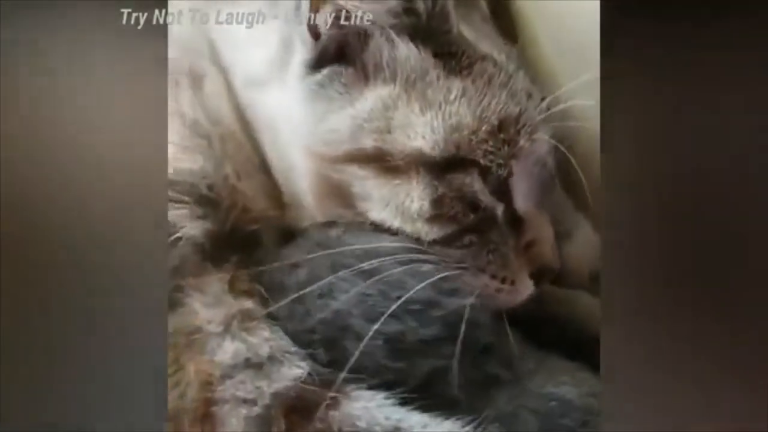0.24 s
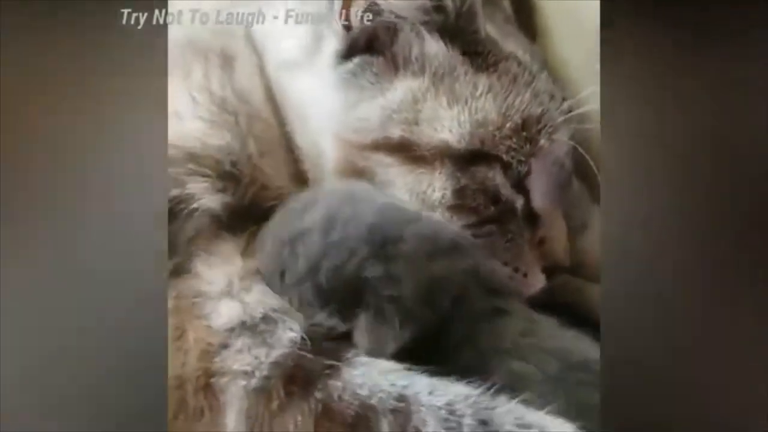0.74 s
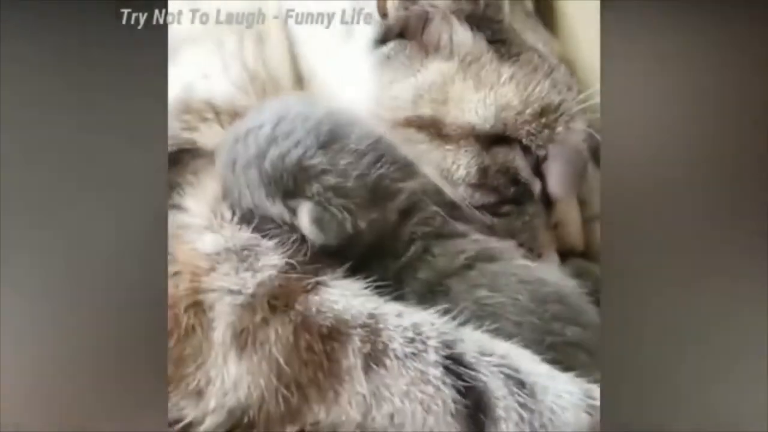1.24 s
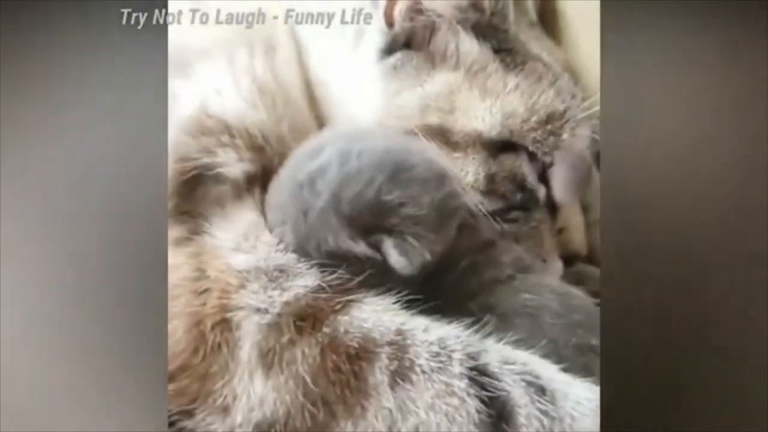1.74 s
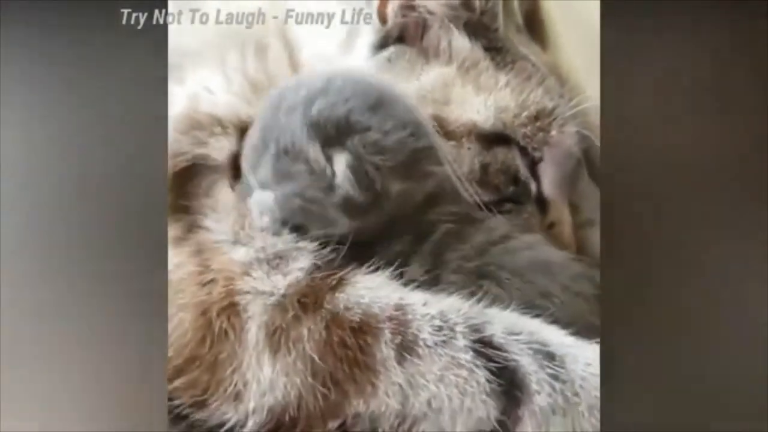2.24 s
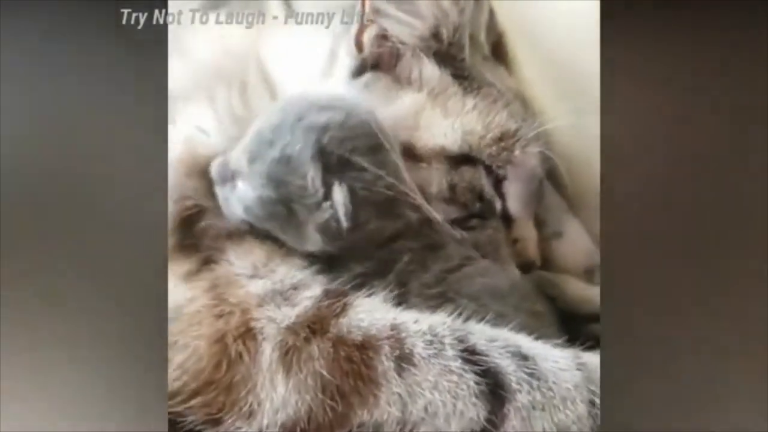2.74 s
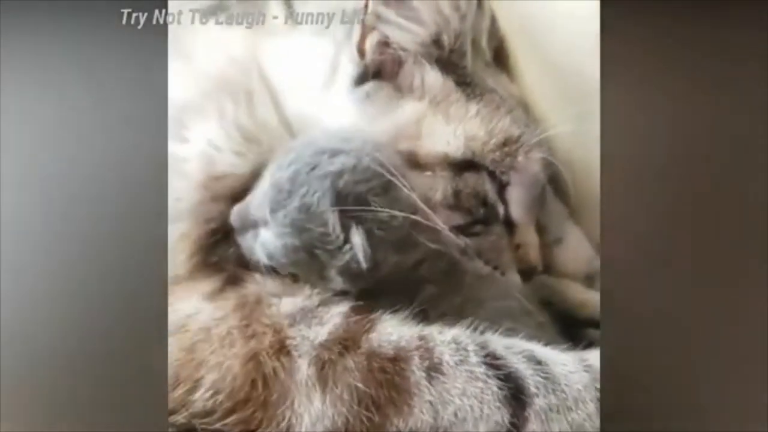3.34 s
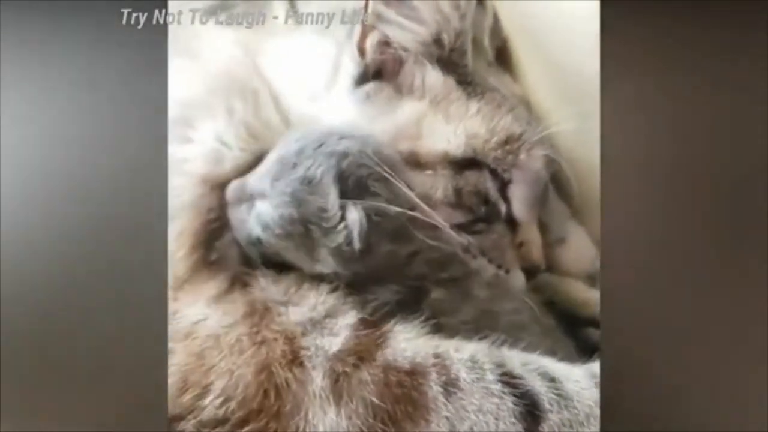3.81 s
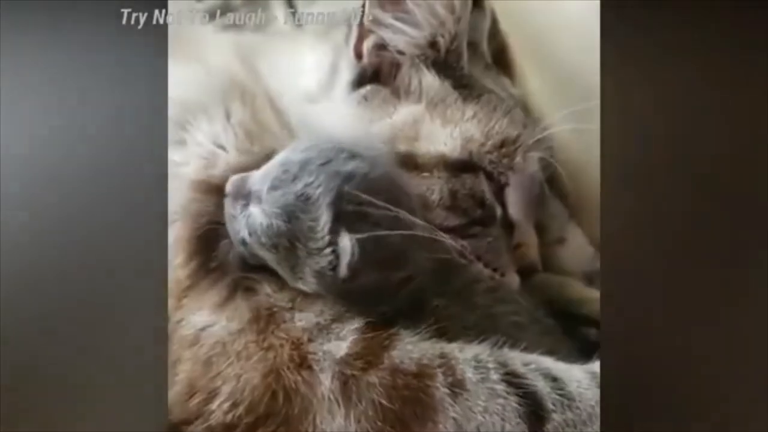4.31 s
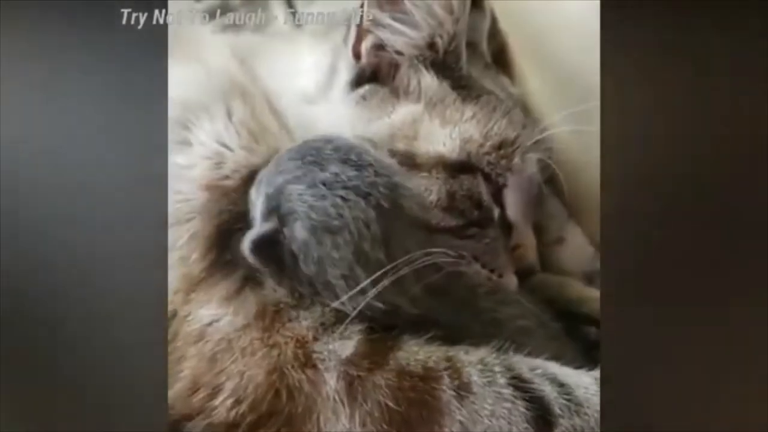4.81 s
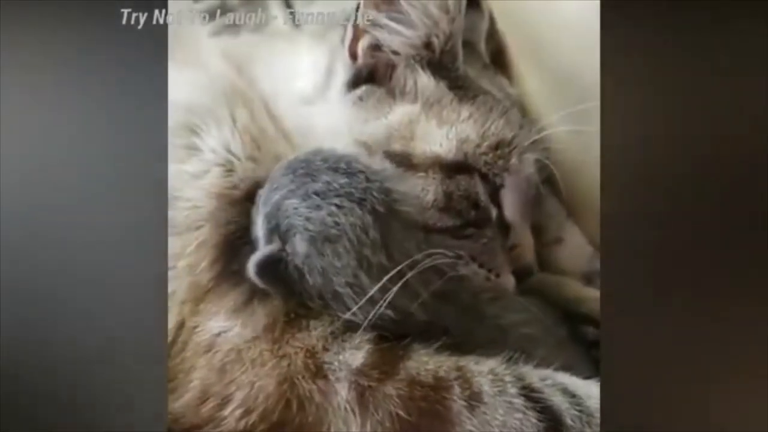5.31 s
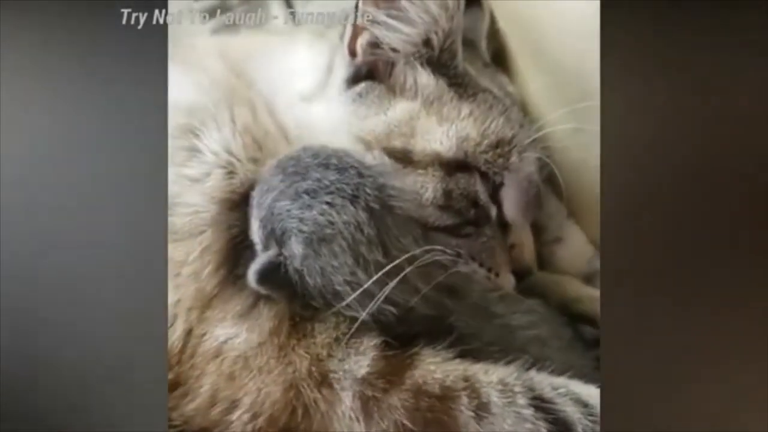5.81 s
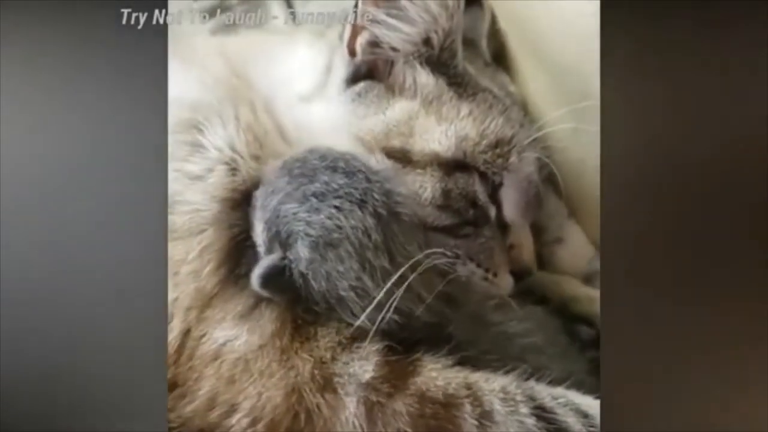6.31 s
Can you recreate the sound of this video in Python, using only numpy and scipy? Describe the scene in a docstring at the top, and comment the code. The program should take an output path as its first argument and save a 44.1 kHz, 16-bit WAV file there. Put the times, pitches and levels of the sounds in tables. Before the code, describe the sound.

Throughout, a cat purrs very close to the microphone in a small quiet room: a low, bassy flutter of paired throat beats, about twenty-six cycles a second, with slight crackly edges and faint nasal hiss. It turns with each breath, stronger on the out-breaths near 0.7-1.3, 2.4-2.8, 3.5-4, 4.7-5.1 and 5.9-6.4 seconds. A faint, thin, slightly rough squeak sounds at 0.1-0.3. Tiny crisp clicks follow at 0.4 and 0.7, brightest at about 0.85, then fur rustles softly until 1.3. Muffled engines drone outside, swelling from 1.4 to 2.8 and sinking in pitch until 3.9, with a brief higher whirr around 3-3.4. More small clicks scatter from 3 to 4.3, one duller knock at 3.7 towards the left. A short low drone passes at about 4, then another steadier engine from 4.7 to the end. Soft traffic rumble, mains hum and hiss remain underneath.

```python
"""A cat purrs beside a phone on a bed: two throat beats a cycle, turning with each breath, and faint air in its nose.
Engines drone outside, small clicks and a thin squeak sound, and fur rustles over mains hum, traffic rumble and hiss.
The throat is struck by impulses and the nose filters noise; engines are sums of overtones with moving levels.
Clicks are noise bursts with room tails, the squeak is a rough tone, and rumble, rush and hiss are coloured noise."""
import sys
import numpy as np
from scipy import signal
from scipy.fft import rfft, irfft, next_fast_len
from scipy.io import wavfile
from scipy.ndimage import uniform_filter1d, map_coordinates

SR = 44100
rng = np.random.default_rng(int(sys.argv[2]) if len(sys.argv) > 2 else 0)


def transcribe(signal):
    """Save signal, clipped to [-1, 1], as a 16-bit WAV file at the path in sys.argv[1]."""
    frames = np.atleast_2d(signal).T
    limited = np.clip(frames, -1, 1)
    pcm = np.round(limited * 32767).astype(np.int16)
    wavfile.write(sys.argv[1], SR, pcm)


N = 288855
TIME = np.arange(N) / SR  # s

BEAT_HZ = 26.25  # cycles of the purr a second, before its pace bends
# pace of the purr, mostly slower breathing out and faster breathing in: time_s, lag_ms (behind a steady beat)
PURR_PACE = [(0, 50.2), (.5, 17.3), (.75, 6.94), (.9, 12.4), (1.15, 16.9), (1.4, 14.1), (1.5, 13.7),
             (1.68, 25.3), (2.125, 32.3), (2.4, 32.2), (2.88, 45.2), (3.25, 34.7), (3.55, 38.7),
             (3.78, 51.5), (4.125, 58), (4.5, 43.8), (4.9, 46), (5.25, 44.7), (5.6, 36), (5.875, 26.8),
             (6.55, 31.6)]


def purr():
    """Source and filter: the larynx shuts and opens each cycle, and these impulses excite the throat's response."""
    # spectra of the throat and of the sharp edge of the beats: frequency_hz, relative_level_db
    throat_spectrum = [(40, -34.5), (70, -7), (150, -4), (230, 2), (330, -3), (430, -9.5), (490, -15.5),
                       (560, -29), (750, -35), (1500, -52.5), (4000, -57), (20000, -100)]
    snap_spectrum = [(300, -24.5), (550, -4.5), (750, -0.5), (1100, -9.5), (2000, -22.5), (3000, -28),
                     (6000, -41), (20000, -80.5)]
    # the sharpest snaps in the throat: time_s, gain_db
    sharp_snaps = [(0.339, -66), (0.378, -62), (0.414, -56.5), (0.449, -57), (0.522, -61), (0.594, -63),
                   (0.667, -64), (0.861, -61), (1.357, -58.5), (1.715, -60.5), (2.511, -64), (2.525, -63),
                   (2.588, -65), (2.628, -62), (2.601, -59), (2.641, -59.5), (2.719, -64), (2.838, -68),
                   (2.975, -60), (2.988, -63), (3.024, -66), (3.133, -63), (3.285, -61), (3.755, -56),
                   (3.795, -55.5), (4.212, -60), (4.475, -65), (4.781, -64), (4.863, -58.5), (4.885, -60),
                   (5.125, -67), (5.236, -66), (5.273, -62), (5.31, -61.5), (6.047, -62)]
    steady = np.arange(-1, N / SR * BEAT_HZ) / BEAT_HZ
    first = steady + curves(PURR_PACE, steady + .03)[0] / 1000 - .002
    # the sign of each gain is the air's direction
    opening = breathing(first, 2, turn_db=-10)
    closing = breathing(first, 3, turn_db=-6)
    chance = rng.standard_normal((len(first), 6))
    # the two beats lie further apart breathing out
    second = first + np.where(opening < 0, .015, .012) + .0006 * chance[:, 0]
    first = first + .0005 * chance[:, 1]
    beats = train(first, opening * amp(1.6 * chance[:, 2]))
    closings = train(second, closing * amp(1.7 * chance[:, 3]))

    snaps = train(second, closing * amp(-22 + 2 * chance[:, 4]))
    snaps += train(first, opening * amp(-29 + 2.5 * chance[:, 2]))
    sharp_s, sharp_db = np.transpose(sharp_snaps)
    snaps += train(sharp_s, np.sign(breathing(sharp_s, 3, 0)) * amp(sharp_db))
    # the folds rebound once, weakly, after the second beat
    closings += train(second + 0.01102, closing * amp(-12 + 3 * chance[:, 5]))

    # a puff of turbulent air follows each beat through the same throat
    puff_decay = amp(-60 * TIME[:2000] / 0.055)
    puff = np.convolve(abs(beats + closings), puff_decay)[:N] * rng.standard_normal(N)
    excitation = beats + closings + amp(-41) * puff
    voice = signal.fftconvolve(excitation, pulse(throat_spectrum))[:N]
    edge = signal.fftconvolve(snaps, pulse(snap_spectrum))[:N]
    both = amp(4.0) * (voice + edge * amp([[1.8], [-1.8]]))
    # the throat is nearer the left microphone, which hears it earlier
    return filtered(both, lambda f: np.exp(2j * np.pi * f * np.array([[.00013], [-.00013]])))


def nose():
    """Resonance of turbulent air: hiss excites the modes of the nose, and each direction of breath favours other modes."""
    # modes, each passed twice by the air: centre_hz, width_hz (of one pass)
    modes = [(1380, 500), (2450, 380), (2850, 320), (7300, 1300)]
    # level of each mode: rest_gain_db, in_gain_db and out_gain_db (both over the air)
    mode_gains = [(-99, 3.5, 0), (-102, 1.5, -7.5), (-101, 1, 2), (-89.5, 3.5, -2)]
    air = breathing(TIME, 4, turn_db=-25)
    # the larynx chops the air once a cycle
    cycle = 2 * np.pi * BEAT_HZ * (TIME - curves(PURR_PACE)[0] / 1000 - .02)
    air = air * amp(2.5 * np.cos(cycle))
    inward, outward = np.maximum(air, 0), np.maximum(-air, 0)
    total = 0
    for (rest_db, in_db, out_db), mode in zip(mode_gains, modes):
        gain = amp(rest_db) + amp(in_db) * inward + amp(out_db) * outward
        flutter = amp(2.4 * wobble(90))
        hiss = rush(lambda f: resonance(*mode)(f) ** 2, patchy_db=2.0)
        total = total + gain * flutter * hiss * amp([[1.6], [-1.6]])
    return total


def breathing(t, column, turn_db):
    """Alternating flow: a column's gain peaks amid each breath, changes by turn_db at the turns, and has the air's sign."""
    # breaths, each lasting until the next:
    # start_s, direction (sign only: + in, - out), first_beat_gain_db, second_beat_gain_db, nose_air_gain_db
    breaths = np.array([(-.05, 1, -46.5, -46.5, -89), (.72, -1, -39, -42.5, -82),
                        (1.346, 0.99, -42.5, -50.5, -95), (1.47, -1, -45.5, -44.5, -91.5),
                        (1.84, 1, -45.5, -44.5, -89.5), (2.4, -1.03, -41, -43, -84),
                        (2.8, 1, -55, -44.5, -98), (3.5, -0.91, -41, -44, -81.5),
                        (4.05, 1, -47, -46.5, -102), (4.68, -1, -41.5, -43.5, -83),
                        (5.12, 1, -51, -46, -96), (5.87, -1.02, -42, -44, -87),
                        (6.36, 0.99, -47, -48.5, -92.5)])
    turns = np.append(breaths[:, 0], 6.8)  # the last breath ends at 6.8 s
    now = np.clip(np.searchsorted(turns, t) - 1, 0, len(breaths) - 1)
    part = (t - turns[now]) / np.diff(turns)[now]
    return np.sign(breaths[now, 1]) * amp(breaths[now, column] + turn_db * (2 * part - 1) ** 2)


def engines():
    """Harmonic series of periodic firing: three engines in turn, and two lone tones among them."""
    # engines: time_s, firing_rate_hz, then one gain_db for each overtone
    passing = [(0.02, 36.3, -43.5, -54, -45.5, -49.5), (0.14, 38.22, -64.5, -45, -59, -63),
               (0.51, 37.84, -57, -52.5, -50, -53.5), (0.66, 38.33, -53, -42, -44.5, -67),
               (0.86, 39.07, -49.5, -72, -54.5, -53.5), (0.98, 37.28, -78, -60, -66, -51),
               (1.08, 37.97, -49, -47, -44.5, -51), (1.16, 36.7, -47, -49, -47, -65),
               (1.29, 38.93, -47, -43.5, -42, -64), (1.43, 37.17, -39, -39, -42.5, -57),
               (1.55, 38.57, -40, -45, -38.5, -62), (1.65, 37.8, -47, -32.5, -53, -65),
               (1.72, 36.9, -34, -39.5, -60.5, -41.5), (1.78, 37.63, -49, -33.5, -34.5, -49.5),
               (2.02, 36.92, -36.5, -38, -58.5, -49), (2.09, 37.38, -63.5, -34, -52, -55),
               (2.14, 36.86, -43.5, -35.5, -54, -65), (2.2, 35.95, -41, -32.5, -51.5, -41),
               (2.26, 36.06, -35.5, -58, -56, -53.5), (2.38, 35.93, -38.5, -40, -55, -45.5),
               (2.45, 35.33, -42, -55, -63.5, -59), (2.5, 35.02, -35, -38, -44, -55.5),
               (2.55, 35.12, -38, -45, -51, -61), (2.59, 35.18, -32, -37.5, -43, -70),
               (2.66, 35.12, -37.5, -37.5, -57, -48), (2.7, 34.5, -40, -36.5, -56, -50),
               (2.75, 34.32, -38, -47, -68.5, -49), (2.81, 33.96, -39.5, -44, -47, -48),
               (3.0, 32.43, -54, -45.5, -58, -48.5), (3.16, 31.01, -45, -45, -53, -49.5),
               (3.24, 30.66, -46, -43.5, -67, -50), (3.27, 30.67, -53, -68, -53, -47),
               (3.34, 29.9, -49, -36, -58, -44), (3.38, 29.74, -48, -63, -61, -41.5),
               (3.43, 30.5, -45, -58.5, -57, -43.5), (3.46, 30.28, -48, -55, -72.5, -44),
               (3.54, 29.83, -68, -52, -59.5, -40.5), (3.82, 28.2, -62, -53, -67, -42),
               (3.87, 27.73, -54, -48, -62, -64), (3.9, 27.8, -55, -49, -44, -55)]
    brief = [(3.85, 55.67, -76, -62), (3.9, 54.2, -47.5, -44.5), (4.05, 54.77, -44, -49.5),
             (4.22, 54.77, -49.5, -41.5), (4.29, 55, -47, -46), (4.36, 54.6, -49, -54)]
    later = [(4.75, 36.63, -66, -57.5, -61), (4.95, 36.66, -50, -52, -56.5),
             (5.046, 36.62, -36.5, -56, -53), (5.108, 36.87, -58, -48, -55), (5.18, 36.64, -39, -50, -69),
             (5.25, 36.96, -42, -50, -52), (5.4, 35.52, -55, -56, -58), (5.55, 36.15, -47.5, -43.5, -51),
             (5.72, 36.72, -61, -41, -61), (5.874, 37.23, -59, -44, -61), (6.1, 37.16, -47.5, -40, -52),
             (6.2, 37.05, -61, -45, -52.5), (6.35, 37.16, -61, -44, -67), (6.55, 37.33, -45, -39.5, -49)]
    # the first engine's sixth overtone, heard for a moment: time_s, pitch_hz, gain_db
    sixth = [(2.15, 216, -58), (2.3, 215.7, -52), (2.5, 210, -53), (2.7, 207.1, -54), (2.8, 204, -60)]
    # a short higher tone: time_s, pitch_hz, gain_db
    whirr = [(2.98, 248.2, -69), (3.076, 247.6, -54.5), (3.208, 251.2, -54), (3.366, 249.2, -54),
             (3.404, 245.5, -56), (3.45, 246.6, -45.5)]
    drones = engine(passing, range(2, 6), blur=0.054)
    drones = drones + engine(brief, range(2, 4), blur=0.41)
    drones = drones + engine(later, range(3, 6), blur=0.2)
    return drones + engine(sixth, range(1, 2), blur=0.39) + engine(whirr, range(1, 2), blur=0.39)


def engine(rows, orders, blur):
    """Additive synthesis: overtones in step make each firing throb; reflections on the way blur their phases (rad)."""
    spread_rad = 0.5064  # multiplied by the square of the overtone's number to give its phase lag
    rate_hz, *levels = curves(rows)
    phase = 2 * np.pi * np.cumsum(rate_hz) / SR
    since_start = TIME - rows[0][0] + 0.18
    until_end = rows[-1][0] + 0.058 - TIME
    heard = np.clip(np.minimum(since_start, until_end) / 0.2, 0, 1)
    total = 0
    for k, db in zip(orders, levels):
        level = np.sqrt(2) * amp(db + 0.27 * wobble(12))  # the overtones waver on their way in
        total = total + level * np.sin(k * (phase - spread_rad * k) + blur * wobble(6))
    return heard * total


def clicks():
    """Impact excitation: short bursts of noise between two band edges, each with its own decaying tail in the room."""
    # clicks: start_s, peak_db (of the burst's left-right mean), low_edge_hz, high_edge_hz,
    # left_over_right_db, length_ms
    click_list = [(0.0334, -55.5, 3000, 12200, 0.5, 1.6), (0.385, -44.5, 10600, 13200, -1.5, 3.5),
                  (0.3905, -50, 9050, 13600, -26, 3.5), (0.693, -57, 1426, 11900, -6, 0.59),
                  (0.712, -60, 1700, 3080, -10, 2.4), (0.7458, -38, 10000, 12400, -5.5, 2.6),
                  (0.8442, -36, 8350, 13000, -9.5, 11.6), (0.847, -39.5, 3800, 14100, 0, 7),
                  (0.853, -37, 3180, 13800, -4.5, 2.8), (0.865, -42, 5000, 13900, -5, 7.7),
                  (0.856, -59.5, 2300, 4200, 1, 15), (0.93, -57, 9500, 13000, -7, 2),
                  (0.943, -61, 9504, 13000, -5, 2.2), (1.1134, -53.5, 6000, 12070, -11, 2.4),
                  (1.1178, -53, 4768, 12730, -10.5, 1.7), (1.17, -61, 6994, 12500, -2, 2),
                  (2.976, -59, 1782, 4468, -4, 1.95), (3.2108, -55, 4307, 9990, 3, 2.5),
                  (3.217, -49, 1805, 9200, -8.5, 3.3), (3.226, -53, 4810, 12560, -2, 2.7),
                  (3.2544, -48.5, 9230, 14030, -3, 2.3), (3.29, -62.5, 1800, 5000, -6, 1.3),
                  (3.442, -58, 1810, 2800, -18, 2.6), (3.4416, -67, 3002, 6010, -13, 1.5),
                  (3.719, -52, 1700, 11010, 3.5, 0.9), (3.7219, -40, 800, 5790, 14, 2.58),
                  (3.7285, -62, 2502, 7101, 8, 1.3), (3.904, -63, 1500, 5990, 2, 1.5),
                  (3.9495, -64, 3800, 5980, -4, 2.7), (3.9924, -58, 3000, 7500, -7.5, 2.5),
                  (3.993, -59, 1750, 2600, -9, 3.4), (4.3, -66, 3000, 7000, -5.5, 2.8)]
    # colour that all clicks share: frequency_hz, gain_db
    shell_colour = [(600, 1), (1500, 2.5), (2100, 5), (2800, 3.5), (4000, 1), (6700, 5.5), (8400, 0.5),
                    (9800, 9), (11400, 4.5), (13700, 4.5), (14900, 3), (15200, -18)]
    # colour of the room's answer: frequency_hz, gain_db
    echo_colour = [(500, -10), (1200, 6), (2000, 3), (3500, 3), (5000, 1), (10000, -10), (16000, -0.5)]
    # decay of the room: frequency_hz, t60_s
    room_decay = [(500, 0.16), (3000, 0.08), (10000, 0.22), (16000, 0.15)]
    # a higher top edge than even_hz leans bright, a lower one dull: dB an octave, for each octave
    even_hz, tilt_db = 10000, 3.5
    late_us = 15.2  # the quieter microphone hears later: microseconds a dB
    out, t, size = np.zeros((2, N + SR)), TIME[:SR // 3], 1024
    hz, steps, _ = signal.stft(t, SR, nperseg=256)
    f = np.fft.rfftfreq(size, 1 / SR)
    tail_db = along(echo_colour, hz)[:, None] - 60 * steps / along(room_decay, hz)[:, None]
    for s, db, low_hz, high_hz, pan_db, ms in click_list:
        slope_db, late = tilt_db * np.log2(high_hz / even_hz), -late_us * pan_db
        # a part common to both channels and a part of each one's own
        noise = rng.standard_normal((3, size))
        noise = noise[2] + 0.78 * noise[:2]
        noise = noise * t[:size] * np.exp(-(t[:size] / (ms / 2500)) ** 2)
        low, high = f / low_hz, f / high_hz
        band = (1j * low) ** 3 / (1 + .9j * low - low ** 2) / (1 + 1j * low)
        band = band / (1 + 1.1j * high - high ** 2) ** 2
        delay = np.exp(-2j * np.pi * f * np.array([[max(late, 0)], [max(-late, 0)]]) / 1e6)
        spectrum = rfft(noise)
        # a sharp contact excites all frequencies evenly
        spectrum /= np.sqrt(uniform_filter1d(abs(spectrum) ** 2, size=12, axis=1))
        colour = amp(slope_db * np.log2(low + 1) + along(shell_colour, f))
        burst = irfft(spectrum * band * colour * delay)
        burst *= amp(-60 * np.clip(t[:size] - ms / 500, 0, 1) / 0.0087)
        burst *= amp([[pan_db / 2], [-pan_db / 2]])
        burst *= amp(db) / abs(burst.mean(axis=0)).max()

        z = signal.stft(rng.standard_normal((2, len(t))), SR, nperseg=256)[2]
        tail = signal.istft(z * amp(tail_db), SR, nperseg=256)[1][:, :len(t)]
        tail *= 1 - np.exp(-t / .012)  # the room answers gradually
        sound = amp(-7.5) * signal.fftconvolve(burst, tail / np.linalg.norm(tail[0]), axes=1)
        sound[:, :size] += burst
        out[:, round(s * SR):][:, :sound.shape[1]] += sound
    return out[:, :N]


def squeak():
    """Phase and amplitude modulation: a slightly rough tone, soft at both ends, with decaying higher tones at its start."""
    # a thin squeak: time_s, pitch_hz, gain_db
    squeak_path = [(.06, 1380, -80), (.078, 1375, -68), (.088, 1404, -76), (.1, 1400, -70),
                   (.113, 1400, -69), (.122, 1405, -64), (.136, 1410, -61), (.152, 1400, -64),
                   (.165, 1400, -73), (.18, 1434, -70), (.195, 1420, -84), (.21, 1410, -71),
                   (.236, 1400, -74), (.25, 1370, -93), (.3, 1390, -87), (.32, 1400, -92)]
    # tones that ring at its start: pitch_hz, gain_db, t60_s
    start_tones = [(1530, -69, 0.13), (2490, -70, .3), (2800, -80, .6)]
    hz, db = curves(squeak_path)
    heard = np.clip(np.minimum(TIME - squeak_path[0][0], squeak_path[-1][0] - TIME) / 0.015, 0, 1)
    phase = 2 * np.pi * np.cumsum(hz) / SR + .4 * wobble(130)
    total = heard * amp(db + 3 + 2.5 * wobble(90)) * np.sin(phase)
    since = TIME - .052
    attack = np.clip(since / 0.01, 0, 1)
    for tone_hz, tone_db, t60 in start_tones:
        decay = amp(tone_db - 60 * np.clip(since - .012, 0, 1) / t60)
        total = total + attack * decay * np.sin(2 * np.pi * tone_hz * TIME + .5 * wobble(200))
    return total * amp([[1.5], [-1.5]])


def background():
    """Coloured noise and a sine: rumble and tyre rush through the walls, mains hum, microphone hiss, fur on cloth."""
    # traffic: time_s, rumble_gain_db, tyre_rush_gain_db
    traffic = [(0, -43, -74.5), (.49, -42.5, -78), (.78, -42, -76.5), (1.06, -44.5, -75.5),
               (1.53, -37.5, -77), (2.55, -38, -75), (2.9, -39.5, -78.5), (3.14, -40, -75.5),
               (3.52, -41.5, -78.5), (3.76, -39.5, -73), (4.08, -40, -79), (4.5, -42.5, -77),
               (4.85, -42, -79), (5.18, -42, -79), (5.5, -42, -76), (5.72, -41, -76), (5.84, -40.5, -78),
               (6.55, -43, -78.5)]
    # fur on cloth: time_s, gain_db
    rustle = [(.84, -100), (.88, -74), (.95, -76.5), (1.03, -82), (1.1, -81), (1.14, -74), (1.17, -72.5),
              (1.2, -75.5), (1.24, -76), (1.26, -83), (1.32, -101)]
    # spectra: frequency_hz, relative_level_db
    rumble_spectrum = [(15, -50.5), (25, -27.5), (48, -10), (64, -6.5), (100, -10), (150, -9), (190, -14.5),
                       (260, -23.5), (400, -30.5), (600, -52.5), (2000, -120)]
    tyre_spectrum = [(200, -55), (500, -12.5), (740, 0.5), (1000, -7), (1500, -12), (2200, -13),
                     (3500, -16), (5300, -23), (9000, -65)]
    hiss_spectrum = [(2000, -34), (3500, -5.5), (5200, -5), (6500, -3), (8500, -8), (12200, -1),
                     (14400, -4), (15000, -3), (15250, -50.5)]
    fur_spectrum = [(1500, -29.5), (3000, -9), (3800, -6), (4800, 1), (6200, -0.5), (7400, 3), (8500, -6.5),
                    (11000, -6), (14800, -9), (15200, -58.5)]
    rumble_db, tyre_db = curves(traffic)

    def coloured(spectrum, patchy_db):
        """Linear filtering: white noise takes on the shape of the spectrum."""
        return rush(lambda f: amp(along(spectrum, f)), patchy_db)

    hum = amp(-52 + 1.5 * wobble(2)) * np.sin(2 * np.pi * 60 * TIME)
    fur_gain = amp(curves(rustle)[0] + 2 * wobble(500) + 2.3 * wobble(120))
    fur = fur_gain * coloured(fur_spectrum, patchy_db=1.0) * amp([[-2.5], [2.5]])
    tyres = amp(tyre_db + [[2.5], [-.4]]) * coloured(tyre_spectrum, 1.5)
    hiss = amp(-81.5) * coloured(hiss_spectrum, 1.5)
    rumble = amp(rumble_db - 4.0) * coloured(rumble_spectrum, 1.3)
    return rumble + tyres + hiss + hum + fur


def rush(response, patchy_db):
    """Partial coherence: stereo noise of rms 1, alike by frequency, with patches of random gain."""
    # likeness of left and right: frequency_hz, correlation (-1 to 1)
    likeness = [(30, 0.94), (200, 0.96), (400, 0.43), (700, 0.12), (1300, 0.12), (3100, -0.092),
                (6500, 0.042), (9000, 0.88), (15000, 1)]
    z = signal.stft(rng.standard_normal((2, N)), nperseg=512)[2]
    field = uniform_filter1d(rng.standard_normal(z.shape[1:]), 6, 0)  # smooth over frequency
    field = uniform_filter1d(field, 14, 1)  # smooth over time
    pair = signal.istft(z * amp(patchy_db * unit(field)), nperseg=512)[1][:, :N]

    def mid_side(hz):
        """Coherence: the angle between mid and side sets how alike left and right are."""
        turn = np.arccos(np.clip(along(likeness, hz), -1, 1)) / 2
        return response(hz) * [np.cos(turn), np.sin(turn)]

    mid, side = filtered(pair, mid_side)
    return unit(np.array([mid + side, mid - side]))


def pulse(spectrum, size=8192):
    """Minimum phase: folding the cepstrum gives the causal pulse with this spectrum's shape, here of peak 1."""
    cepstrum = irfft(np.log(amp(along(spectrum, np.fft.rfftfreq(size, 1 / SR)))), size)
    cepstrum[1:size // 2] *= 2
    cepstrum[size // 2 + 1:] = 0
    shape = irfft(np.exp(rfft(cepstrum)), size)[:size // 2]
    return shape / abs(shape).max()


def train(times, sizes):
    """Impulse train: impulses of these sizes at these times (s)."""
    at = np.round(times * SR).astype(int)
    inside = (at >= 0) & (at < N)
    return np.bincount(at[inside], sizes[inside], N)


def resonance(centre_hz, width_hz):
    """Damped oscillator: the frequency response of one mode, 1 at its centre."""
    return lambda f: 1j * f * width_hz / (centre_hz ** 2 - f * f + 1j * f * width_hz)


def filtered(x, response):
    """Linear filtering: the spectrum of x times a complex response of frequency."""
    m = next_fast_len(N + SR // 2)
    return irfft(rfft(x, m) * response(np.fft.rfftfreq(m, 1 / SR)), m)[..., :N]


def wobble(rate):
    """Random modulation: a smooth curve through random knots, rate knots a second."""
    return map_coordinates(rng.standard_normal(int(N * rate / SR) + 4), [TIME * rate])


def curves(rows, t=TIME):
    """Linear interpolation: each column after the time, read at the times t."""
    s, *cols = np.transpose(rows)
    return [np.interp(t, s, c) for c in cols]


def along(points, hz):
    """Logarithmic pitch scale: (frequency_hz, value) points interpolated on a log axis."""
    f, v = np.transpose(points)
    return np.interp(np.log(hz + 1), np.log(f + 1), v)


def unit(x):
    """Root mean square: x scaled to rms 1."""
    return x / np.sqrt(np.mean(x ** 2) + 1e-20)


def amp(db):
    """Decibel scale: the amplitude ratio of a level in dB."""
    return 10 ** (np.asarray(db) / 20)


def scene():
    """Superposition: the sounds of all sources add at the two microphones."""
    outside = engines() * amp([[.2], [-.2]])
    return purr() + nose() + outside + background() + clicks() + squeak()


def record(dry):
    """Frequency response: the microphone colours the treble; the phone keeps nothing above its band limit."""
    # a dip in the microphone's response: frequency_hz, gain_db
    port_dip = [(7600, -1), (8200, -4), (8800, -1.5), (9500, 1)]
    top_hz = 16000

    def response(hz):
        """Band limiting: a sine-squared edge closes over the last 400 Hz."""
        edge = np.sin(np.pi / 2 * np.clip((top_hz - hz) / 400, 0, 1)) ** 2
        return amp(along(port_dip, hz)) * edge

    return filtered(dry, response)


dry = scene()
out = record(dry)
transcribe(out)
```